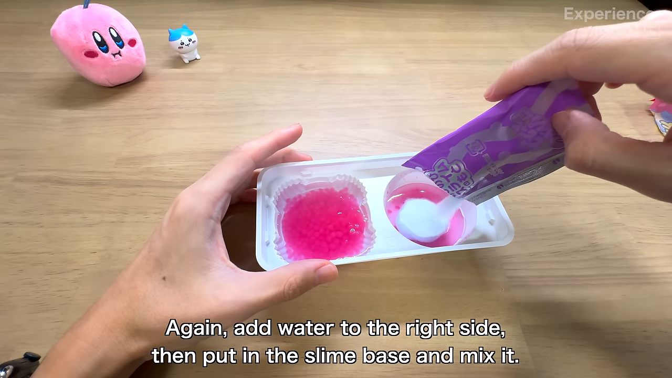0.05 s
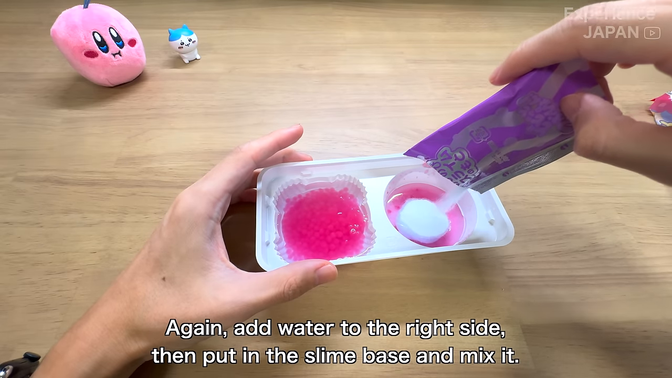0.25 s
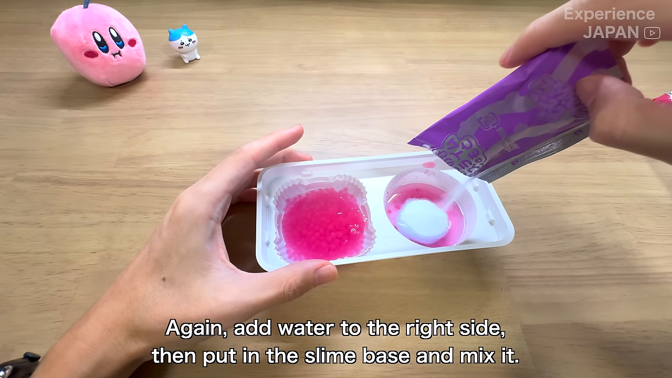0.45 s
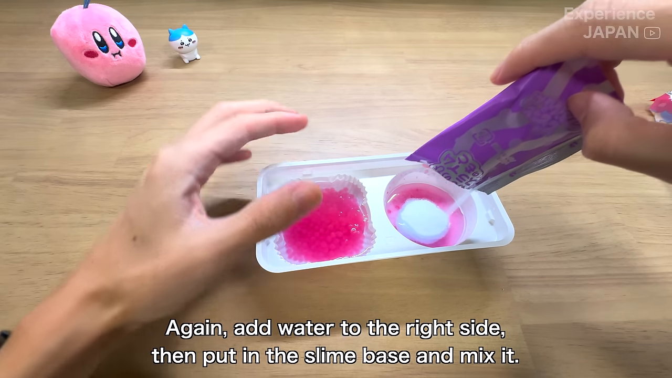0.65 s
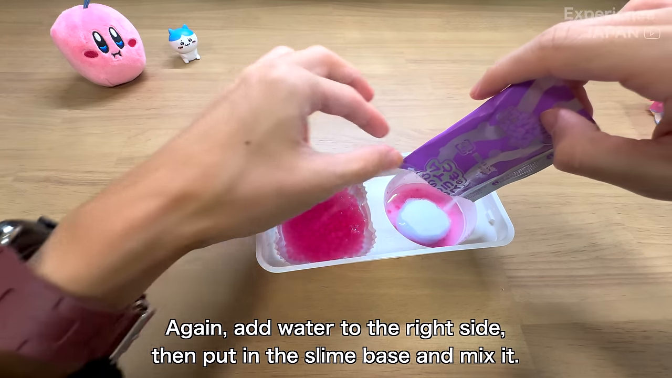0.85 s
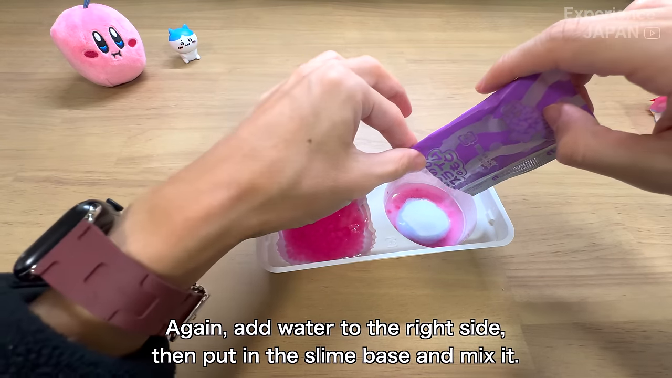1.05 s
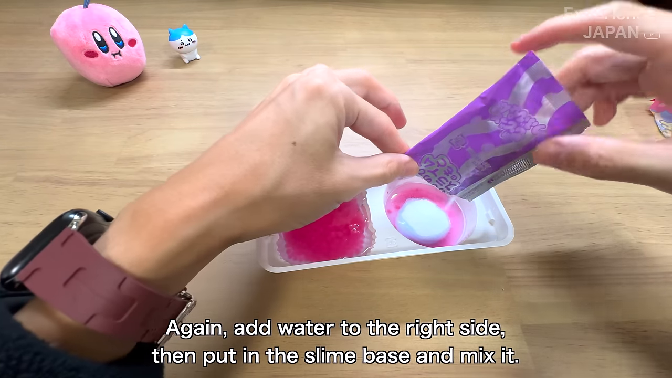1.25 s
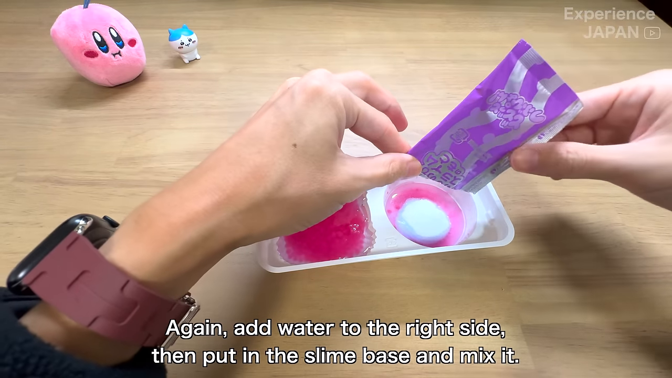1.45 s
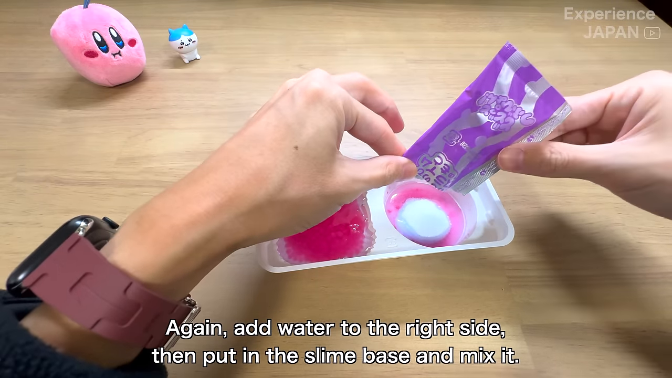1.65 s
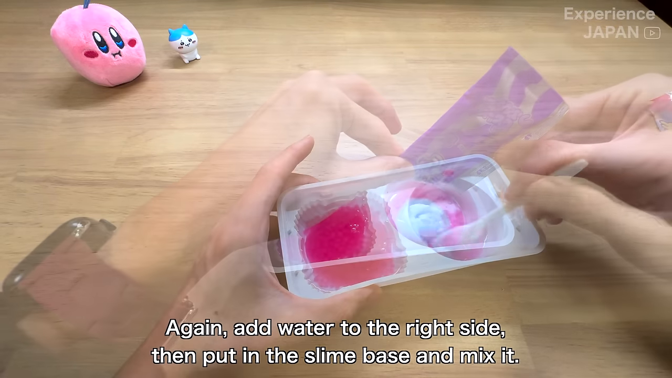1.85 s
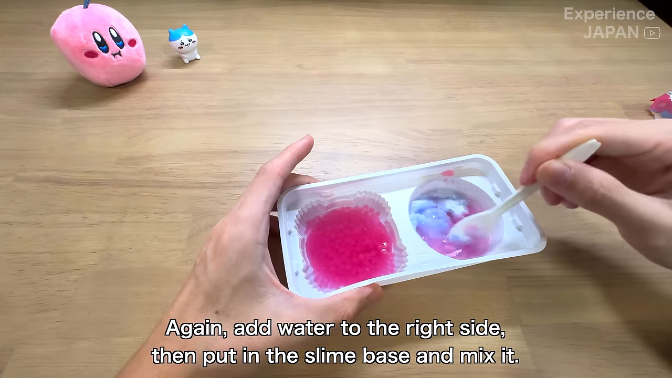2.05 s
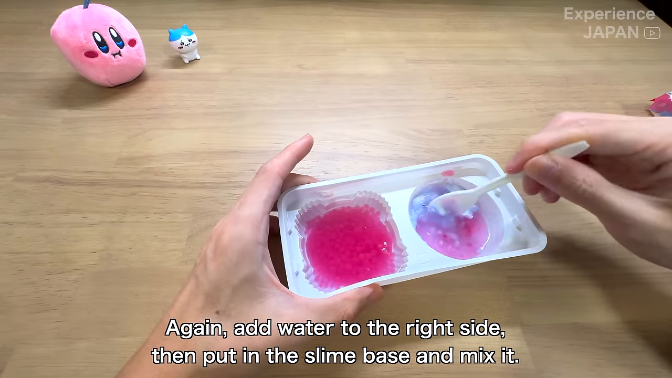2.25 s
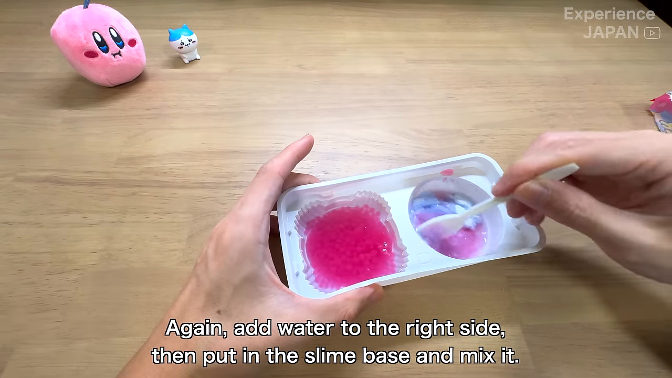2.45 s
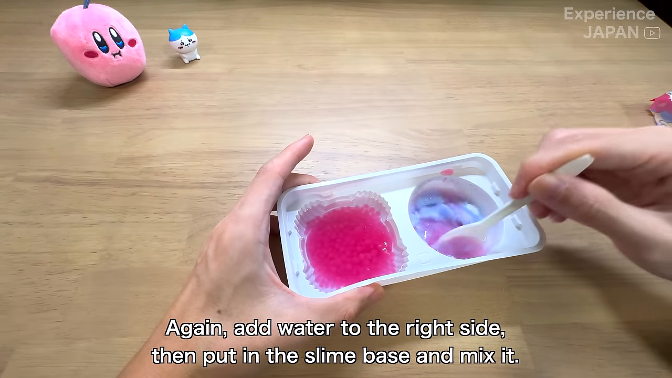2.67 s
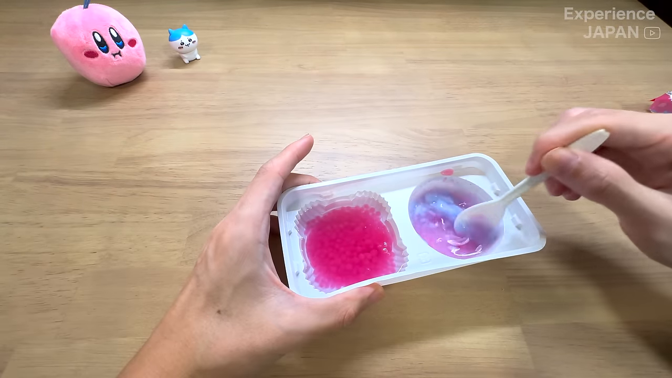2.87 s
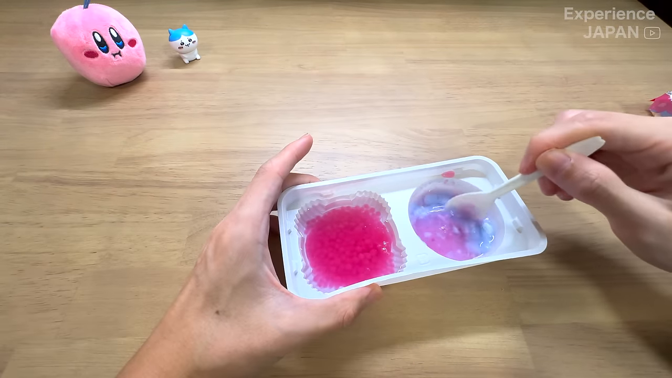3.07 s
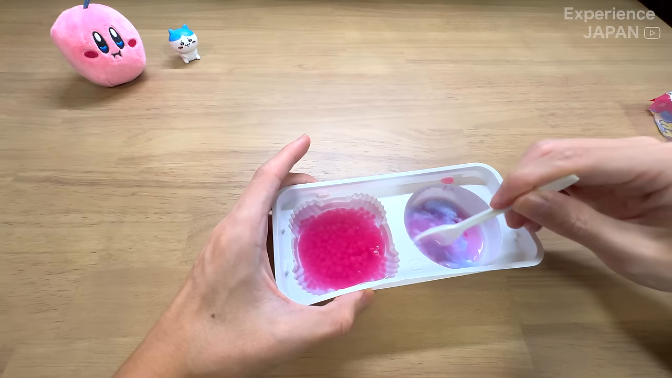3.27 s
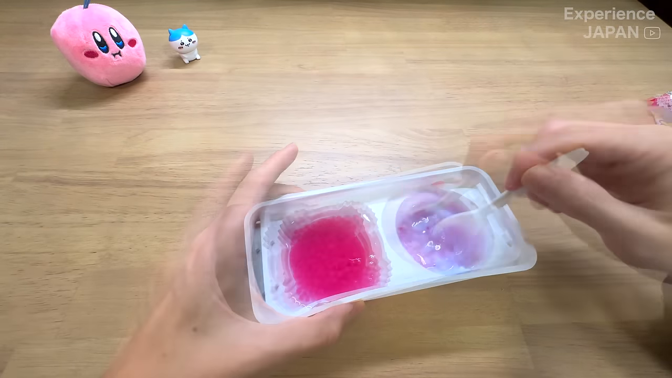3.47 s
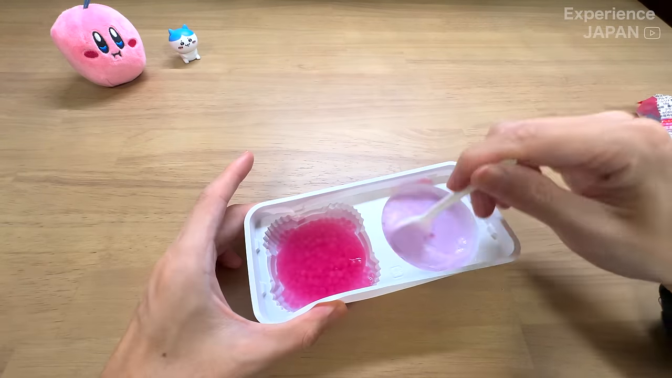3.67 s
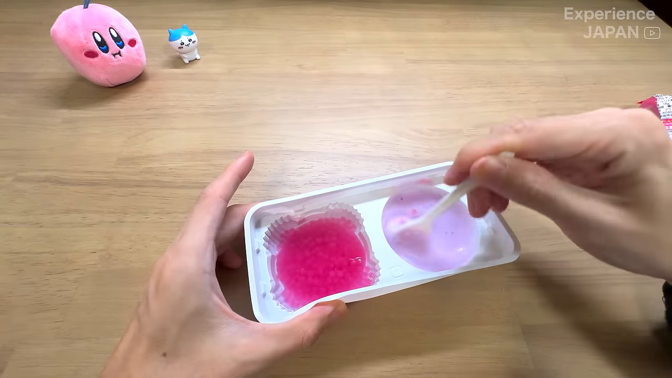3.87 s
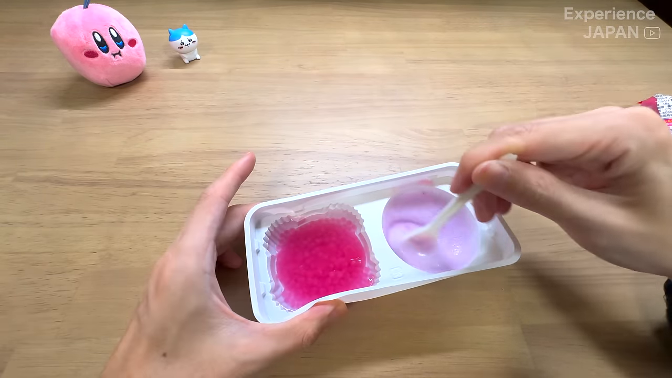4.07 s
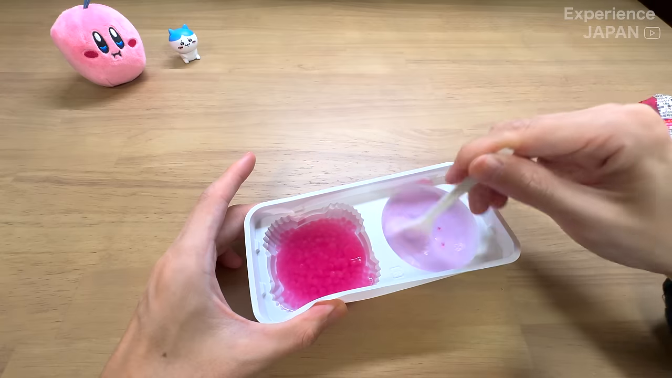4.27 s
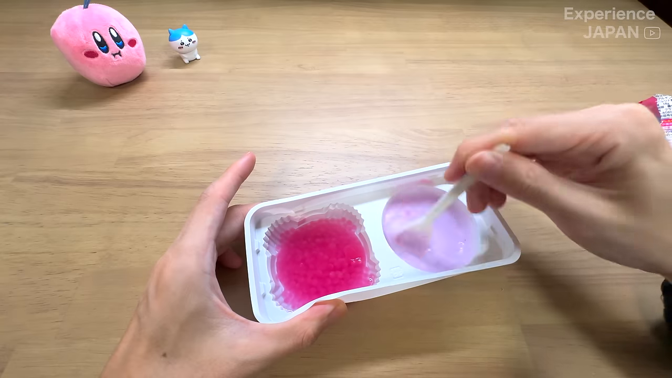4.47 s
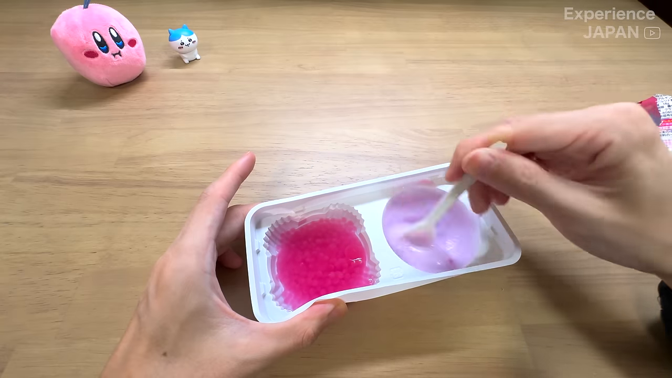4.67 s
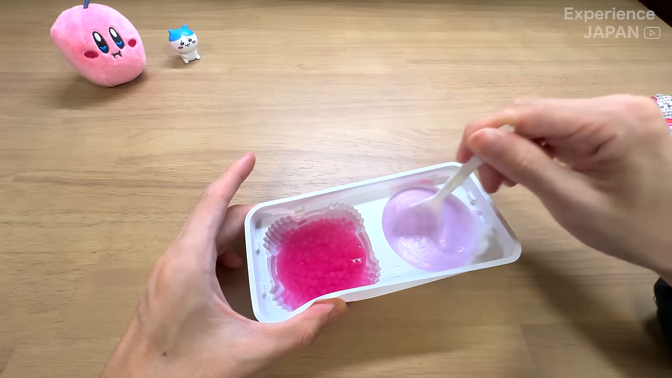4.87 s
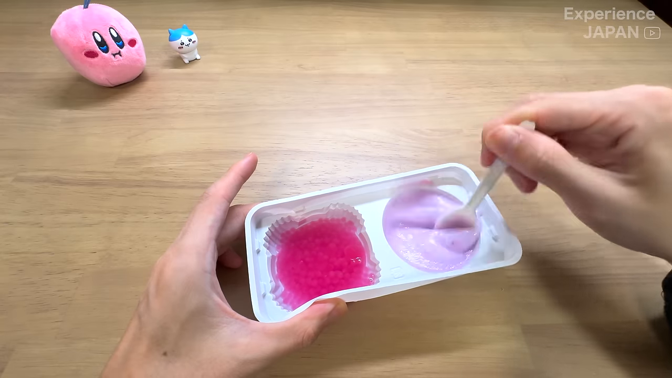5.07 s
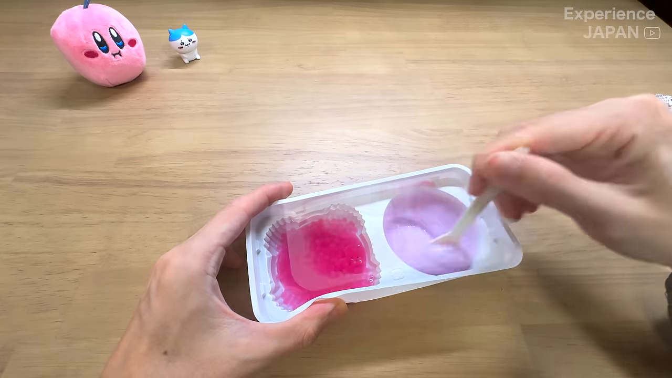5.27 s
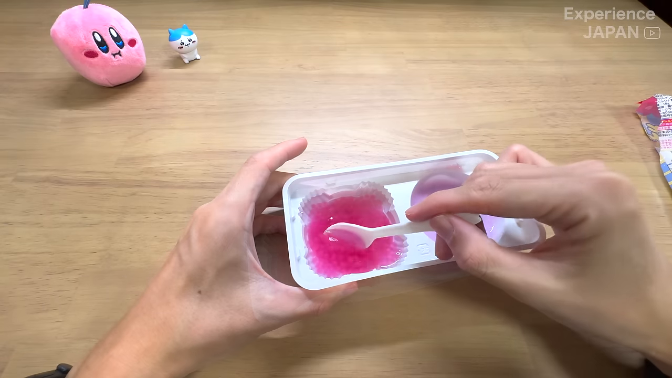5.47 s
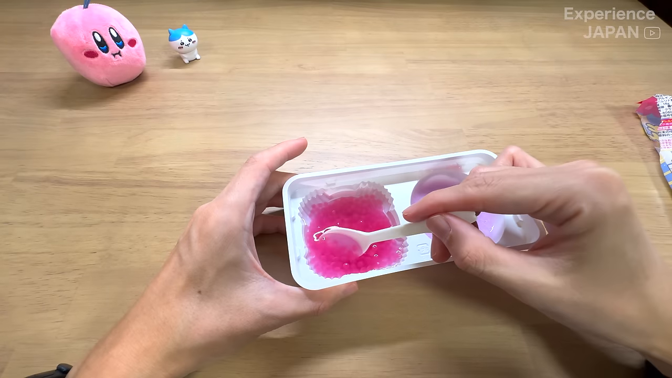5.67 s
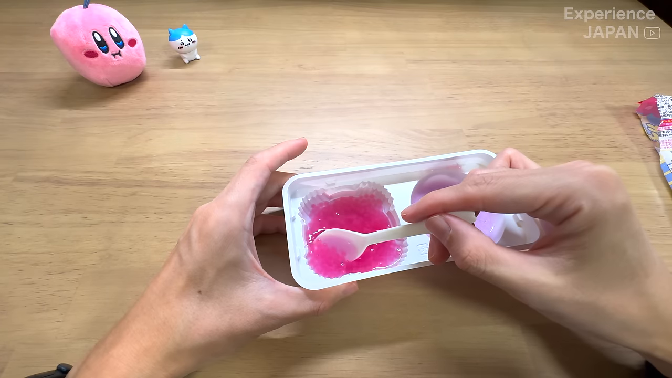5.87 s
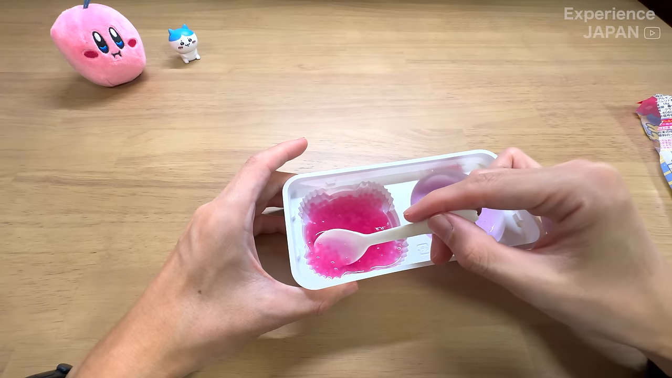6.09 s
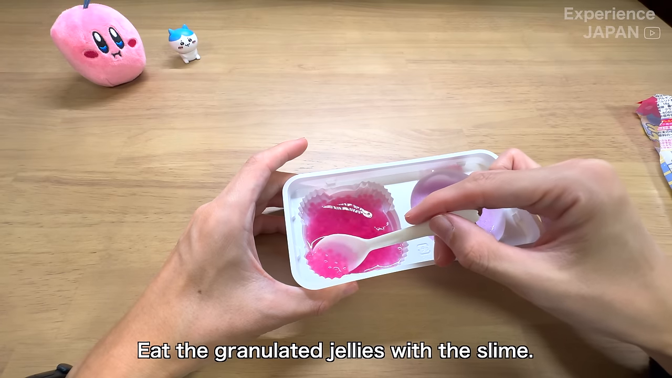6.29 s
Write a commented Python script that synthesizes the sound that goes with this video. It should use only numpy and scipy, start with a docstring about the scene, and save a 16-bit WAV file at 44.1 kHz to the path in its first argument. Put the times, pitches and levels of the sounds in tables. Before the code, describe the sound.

A small quiet room, heard very close in stereo, with faint low air throughout. From 0 to 1 s a fine, thin powder hiss weakens, with a soft packet brush near 0.5. At 1.07 a sharp foil snap breaks out, with a smaller one at 1.16. From 1.43 to 1.85 the packet is flicked and crinkled in a dense, bright crackle, the tray bumping dully on the table near 1.48. From 1.88 a small plastic spoon scrapes and catches; knocks and gritty scrapes crowd 2.26-2.85, strongest near 2.45 and 2.62, then resume more sparsely at 3.05-3.5. From 3.6 to 5.36 the stirring is far quieter: sticky squelches, soft dabs, little rising plops at 3.91, 4.63 and 5.0, and a tiny falling suck at 5.32. A light click at 5.47 leads to a barely audible wet slide until about 5.95, then a small tap at 6.21.

```python
"""Powder hisses out of a foil packet into a thin plastic tray on a wooden table: very fine random grains.
The packet is brushed, flicked and crinkled: noise cracks that ring foil panels, and pitched creases.
A small spoon taps, knocks and scrapes the gritty mix: slips and bursts through the tray's resonances.
The mix turns to slime: squelches in wandering hollows, soft dabs, plops, a falling note as the spoon pulls
free; then a light wet slide in the next well. Small quiet room, close microphone pair, faint air throughout."""
import sys
import numpy as np
from scipy import signal
from scipy.fft import rfft, irfft, next_fast_len
from scipy.io import wavfile

SR = 44100
rng = np.random.default_rng(int(sys.argv[2]) if len(sys.argv) > 2 else 0)


def digitize_waveform(pressure):
    """Quantize a signal to 16-bit integers and store it at the path in sys.argv[1].

    Rows of a 2-D input are taken as channels; values are limited to [-1, 1].
    """
    field = np.atleast_2d(pressure).T
    bounded = np.clip(field, -1, 1)
    quanta = np.round(bounded * 32767).astype(np.int16)
    wavfile.write(sys.argv[1], SR, quanta)


N = 279153
T = np.arange(N) / SR

# room air, relative spectrum: freq_hz, level_db
AIR_SPECTRUM = [(25, -6.5), (60, 7), (130, -2.5), (250, -6), (400, -16), (700, -20.5), (1500, -21),
                (4400, -30.5), (16000, -47)]
AIR_DB = -73

# powder flow down the packet, before POUR_GAIN_DB: time_s, level_db
POUR_FLOW = [(0.03, -58), (0.332, -63), (0.536, -66.5), (0.698, -67.5), (0.828, -72), (1.066, -69),
             (1.198, -65.5), (1.41, -63)]
# powder hiss, relative spectrum: freq_hz, level_db
POWDER_SPECTRUM = [(300, -9.5), (1000, -39), (1800, -14.5), (2600, -5), (3400, -4), (4500, -7), (6500, -4),
                   (8200, 2), (10000, 2.5), (12500, -6.5), (15500, 1)]
POUR_GAIN_DB = 3.5

# brushes of packet and fingers: centre_s, level_db, half_length_s
PACKET_BRUSHES = [(0.518, -55, 0.02), (1.431, -54.5, 0.0071)]
# foil snaps, level over the first 4 ms: start_s, level_db, treble_db, bass_db, panel_pitch_hz
FOIL_SNAPS = [(1.02, -56.5, 12, 16.5, 1710), (1.059, -50.5, -7.5, 8, 2900), (1.0661, -27.5, 16, 1.5, 4500),
              (1.075, -38.5, -3.5, -11, 3240), (1.1593, -39.5, 6.5, -3, 3700),
              (1.4402, -35.5, 17.5, 6.5, 2750), (1.4787, -29.5, 14.5, 2, 3440), (1.483, -26.5, 11, 5, 5900),
              (1.497, -27.5, 9.5, -8.5, 3630), (1.519, -42, -2.5, 0, 4000),
              (1.5354, -44.5, -8.5, -5.5, 4300), (1.571, -43.5, -17, -1.5, 2550),
              (1.5834, -43.5, -21, 2.5, 2670), (1.6083, -38, 16.5, -6, 3480),
              (1.6334, -37, 5.5, -4.5, 4460), (1.639, -34.5, -7.5, -4, 4150),
              (1.648, -39, -4.5, -2.5, 3000), (1.6535, -32, 20, -1, 3200), (1.661, -44.5, 0, -6, 3730),
              (1.668, -38.5, -9, 13, 3100), (1.711, -42.5, -4.5, 0, 2610), (1.7238, -36, -8, -12, 2800),
              (1.7316, -35, 10, -3.5, 3170), (1.736, -36.5, 11.5, 12, 4290), (1.786, -36, 11, -17, 3000),
              (1.7906, -37, -2.5, -7.5, 3080), (1.8027, -39.5, -14, -12, 2900),
              (1.808, -44.5, -10.5, -6, 4000), (1.8191, -42.5, 2, -7, 2210), (1.828, -28, 9, -2, 3120)]
# packet flexes that crackle: start_s, level_db, t60_s
PACKET_FLEXES = [(1.066, -47, 0.13), (1.16, -54, 0.12), (1.49, -37, 0.34), (1.648, -50, 0.14),
                 (1.729, -45.5, 0.076), (1.799, -48.5, 0.14), (1.825, -54.5, 0.37)]
# foil, relative spectrum: freq_hz, level_db
FOIL_SPECTRUM = [(60, -11), (200, -2), (450, -6.5), (800, -5.5), (1400, -8), (2100, -5.5), (3000, -2),
                 (4800, -11.5), (6200, -8.5), (8200, -9.5), (11000, -9), (15000, -15.5)]
STUTTER_S, STUTTER_DB = .005, -10  # greatest delay and strength of the cracks behind a snap
PANEL_DB, PANEL_WIDTH_HZ = 3, 330
FLEX_RISE_S, CREASE_LOW_HZ = .008, 520  # small creases have little bass

# dull bumps of tray on table: start_s, level_db, tilt_db_per_octave
TABLE_BUMPS = [(1.084, -49, 9.5), (1.174, -52.5, 12), (1.4795, -33, -8.5), (1.495, -38, 10.5),
               (1.724, -48, -9), (5.444, -55, 4)]
# tray and table together: freq_hz, level_db, t60_s
TABLE_RINGS = [(124, -11.5, 0.057), (176, 1, 0.04), (209, -5, 0.072), (345, -15, 0.075), (416, -9.5, 0.06)]

# spoon taps on the bottom of a well: start_s, level_db, tilt_db_per_octave
WELL_TAPS = [(1.652, -48, -8), (2.580, -38, -5), (3.401, -38, -13), (6.215, -46, 9)]
# bottom of a well: freq_hz, level_db, t60_s
WELL_RINGS = [(770, -8, 0.075), (1090, -4.5, 0.046), (1420, -9.5, 0.021), (2030, -13.5, 0.02)]

# spoon catching on the tray, before KNOCK_GAIN_DB: start_s, level_db, treble_db
SPOON_KNOCKS = [(1.8781, -33.5, 11), (1.9124, -36.5, -1), (2.0299, -34.5, -20), (2.2591, -39, -1),
                (2.3232, -30.5, 6), (2.4228, -31, 6.5), (2.4484, -22, 3.5), (2.5366, -33.5, -3.5),
                (2.5786, -31.5, 1), (2.611, -25, 15), (2.6249, -26, 21.5), (2.653, -36, -7.5),
                (2.7064, -26, 6), (2.7122, -29.5, -8), (2.7274, -36.5, -10), (2.7929, -35.5, -8),
                (2.8272, -33.5, 1), (3.0493, -39, 1), (3.1088, -35, 1), (3.174, -33, 10),
                (3.2683, -26.5, 3), (3.2764, -25.5, -0.5), (3.2814, -27, -10), (3.3146, -31, -10),
                (3.3352, -33.5, -11), (3.358, -39, -3), (3.3985, -32, -25), (3.4663, -27, 5),
                (4.911, -42.5, 23), (5.3185, -39.5, 0), (5.4711, -40, -8), (6.2148, -47, -1)]
# spells of spoon work: start_s, end_s, level_db, slope_db_per_s, treble_db, release_t60_s
SPOON_SPELLS = [(1.884, 2.022, -47, -18, 5, 0.14), (2.263, 2.85, -48.5, -11.5, 5.5, 0.039),
                (3.073, 3.272, -52, 8, 1, .2), (3.307, 3.504, -45.5, 12, -0.5, 0.39),
                (3.604, 3.87, -65.5, 9, 4.5, 0.12), (3.902, 4.568, -61, -2.5, 2, 0.29),
                (4.617, 5.002, -61, 7.5, 2, 0.76), (5.117, 5.358, -60, -7, 4, 0.39),
                (5.462, 5.963, -66, -22, 1, 0.19), (6.215, 6.314, -71, -38, 0.5, 0.15)]
# hard pushes through the grit: centre_s, level_db, treble_db
GRIT_PUSHES = [(1.893, -47.5, -12), (2.02, -48.5, 11), (2.356, -48.5, 1.5), (2.452, -41, -3),
               (2.579, -45, -12), (2.631, -36.5, 9.5), (2.664, -40, 5), (2.722, -40, -5.5),
               (2.784, -46, 4.5), (2.855, -46, 3.5), (3.116, -46.5, -4.5), (3.174, -45, 2),
               (3.355, -42, -1), (3.42, -48, -22)]
# wet smacks of the spoon: centre_s, level_db
WET_SMACKS = [(3.658, -61), (3.718, -58.5), (3.8, -60.5), (3.838, -59), (3.863, -58.5), (3.97, -59.5),
              (4.004, -67), (4.069, -60.5), (4.116, -53.5), (4.193, -57.5), (4.236, -58.5), (4.266, -60.5),
              (4.33, -62), (4.425, -61.5), (4.632, -59.5), (4.702, -54.5), (4.91, -58.5), (4.979, -59),
              (5.124, -64), (5.16, -59), (5.283, -57), (6.124, -65.5)]
# spoon pressing through jelly in the other well: centre_s, level_db
JELLY_WIPES = [(5.545, -72), (5.673, -67), (5.804, -72)]
# tray walls: freq_hz, width_hz, level_db
WALL_MODES = [(754, 15, 2.5), (1130, 110, -18), (1530, 13, 1), (2007, 260, 0.5), (2692, 50, -2),
              (3514, 77, -7)]
# gritty mix, relative spectrum: freq_hz, level_db
GRIT_SPECTRUM = [(60, -13), (170, -8), (520, -13.5), (750, -8), (1200, -0.5), (2000, -1), (3300, -0.5),
                 (4800, -8.5), (6200, -7.5), (8800, -6.5), (11000, -3), (15000, -13.5)]
SPELL_ATTACK_S = .0091
PUSH_S, SMACK_S, WIPE_S = .02, .016, .024  # half lengths
SKID_DELAY_S, SKID_S, SKID_DB = .0044, .014, -18.5  # after a knock: delay, half length, level against its row
REST_DB, REST_START_S, REST_END_S, REST_RISE_S = -72.5, 2.23, 3.05, .035  # faint steady rubbing
KNOCK_GAIN_DB = -7
# random lighter catches, before KNOCK_GAIN_DB: level above the rubbing, spreads of level and treble
CATCH_DB, CATCH_SPREAD_DB, CATCH_TREBLE_DB = 3, 2, 3
SMOOTH_FROM_S, OTHER_WELL_FROM_S, BLEND_S = 3.62, 5.46, .049

# random nudges of tray on table
NUDGE_START_S, NUDGE_END_S, NUDGE_DB, NUDGE_SPREAD_DB = 2.25, 2.9, -61, 3

# slime, relative spectrum: freq_hz, level_db
SLIME_SPECTRUM = [(80, -15), (200, -7), (330, -6.5), (620, -2), (900, -4.5), (1400, -7), (2000, -4),
                  (2700, -9), (3600, -6), (5000, -13.5), (6500, -14), (9300, -8), (12500, -14.5),
                  (15000, -10)]
# hollows in the slime: middle_pitch_hz, level_db
SLIME_HOLLOWS = [(720, -5), (2800, -3)]
HOLLOW_SWING_OCTAVES, HOLLOW_PER_S, HOLLOW_SHARPNESS = .6, 22, 3.5
# folds of slime flopping over: centre_s, level_db, pitch_hz
SLIME_DABS = [(3.704, -65.5, 290), (3.901, -60, 380), (4.046, -62.5, 373), (4.704, -60, 487),
              (4.87, -60.5, 420), (5.083, -62, 327)]
DAB_S = .0078  # half length
# air pockets popping in the slime: start_s, peak_db, pitch_hz
SLIME_PLOPS = [(3.914, -55, 610), (4.632, -49.5, 656), (5.0, -46, 580)]
PLOP_CYCLES, PLOP_RISE = 8.8, .16  # starting-pitch cycles to -60 dB; share the pitch has risen by then
# spoon pulling free of the slime, one row: centre_s, peak_db, pitch_hz
SPOON_SUCK = (5.3205, -43, 900)
SUCK_S, SUCK_OCTAVES_PER_S = .0036, 440  # half length; fall of pitch

# wet plastic, relative spectrum: freq_hz, level_db
WET_SPECTRUM = [(600, -12.5), (1100, -0.5), (1500, 3), (2700, 2), (3600, 0), (4600, -9.5), (6100, -6),
                (7600, -7.5), (9000, -8), (14000, -22)]

# reflections, relative spectrum: freq_hz, level_db
REFLECTION_SPECTRUM = [(200, 10), (550, 9), (1000, 9), (1700, -4.5), (3500, 3), (5000, 7.5), (9500, 4.5),
                       (13000, -23.5)]
# phase of left against right: freq_hz, phase_rad
LEFT_PHASE = [(0, 0), (2000, 0), (4000, -.35), (6500, -.7), (8500, -1.7), (9500, -1.45), (11200, -2.95),
              (13900, -3.3), (15500, -4.3)]
# level of the left microphone over the right: freq_hz, level_db
LEFT_LEVEL = [(60, 2.5), (130, 2), (300, 6), (600, 3.5), (1400, -0.5), (2800, 1.5), (5600, 2), (9000, -0.6)]
CUTOFF_HZ = 16200


def from_db(db):
    """Decibels to gain."""
    return 10 ** (np.asarray(db) / 20)


def rms_one(x):
    """Scale to unit power."""
    return x / np.sqrt(np.mean(x ** 2) + 1e-20)


def add(track, s, sound):
    """Mix a short sound in at time s."""
    at = max(round(s * SR), 0)
    track[at:at + len(sound)] += sound[:len(track) - at]


def cut(x, hz, kind, order=2):
    """Butterworth low- or high-pass."""
    return signal.sosfilt(signal.butter(order, hz, kind, fs=SR, output="sos"), x)


def colour(x, spectrum, size=4096):
    """Minimum-phase filter with the given spectrum, falling off below its first point."""
    hz, db = np.transpose(spectrum)
    f = np.maximum(np.arange(size // 2 + 1) * SR / size, 1)
    gain = from_db(np.interp(np.log(f), np.log(hz), db)) * np.minimum(f / hz[0], 1)
    # fold the cepstrum to make the response causal
    cepstrum = irfft(np.log(gain))
    cepstrum[1:size // 2] *= 2
    cepstrum[size // 2 + 1:] = 0
    response = irfft(np.exp(rfft(cepstrum)))
    filtered = signal.fftconvolve(np.atleast_2d(x), response[None], axes=1)
    return filtered[:, :x.shape[-1]].reshape(x.shape)


def drift(rate_per_s):
    """Smooth random curve of unit power, with rate_per_s new targets a second."""
    knots = rng.standard_normal(N // 10)
    return rms_one(np.interp(T * rate_per_s, np.arange(len(knots)), knots))


def swell(s, half_s):
    """Gaussian rise and fall of height 1 about time s."""
    out = np.zeros(N)
    near = np.abs(T - s) < 4 * half_s
    out[near] = np.exp(-((T[near] - s) / half_s) ** 2)
    return out


def held(start_s, end_s, attack_s, t60_s):
    """Rise to 1 at the start, hold until the end, then decay."""
    rise = np.exp(-(np.minimum(T - start_s, 0) / attack_s) ** 2)
    return rise * from_db(-60 * np.maximum(T - end_s, 0) / t60_s)


def scattered(start_s, end_s, count):
    """Random moments, one in each equal share of a span."""
    return start_s + (end_s - start_s) * (np.arange(count) + rng.random(count)) / count


def grains(per_s, spread_db, clump_db, clump_per_s):
    """Tiny slips of random time, size and sign; clump_db makes their strength drift."""
    sizes = from_db(spread_db * np.minimum(rng.exponential(1, N), 4)) * rng.choice([-1, 1], N)
    present = rng.random(N) < per_s / SR
    return sizes * present * from_db(clump_db * np.clip(drift(clump_per_s), -2, 2))


def resonator(hz, width_hz):
    """Coefficients of a two-pole resonance with gain 1 on top."""
    r = np.exp(-np.pi * width_hz / SR)
    zeros = np.array([1, 0, -1]) * (1 - r * r) / 2
    return zeros, [1, -2 * r * np.cos(2 * np.pi * hz / SR), r * r]


def resonate(x, hz, width_hz):
    """Ring one fixed resonance."""
    return signal.lfilter(*resonator(hz, width_hz), x + 1e-18)


def pitched(clicks, sharpness, patchy_db, patchy_per_s, plain_db, count=40):
    """Each grain rings one of many pitches, and the favoured pitches shift as the contact moves."""
    out, at = np.zeros(N), np.flatnonzero(clicks)
    dealt = rng.integers(0, count, N)[at]
    for k, hz in enumerate(np.geomspace(220, 15000, count)):
        mine, own = at[dealt == k], np.zeros(N)
        favour = np.clip(rng.standard_normal(N // 100), -1.8, 1.8)
        patch = np.interp(T[mine] * patchy_per_s, np.arange(len(favour)), favour)
        own[mine] = clicks[mine] * from_db(patchy_db * patch)
        out += resonate(own, hz, hz / max(sharpness, 2)) * (-1) ** k
    return rms_one(out) + from_db(plain_db) * rms_one(clicks)


def brighten(x, treble_db, split_hz=4700):
    """A harder contact lifts the treble; scaled by the power of both bands."""
    low = cut(x, split_hz, "low", order=3)
    high = cut(x, split_hz, "high", order=3)
    lift = from_db(treble_db)
    return (low + lift * high) / np.sqrt(low.var() + lift ** 2 * high.var())


def bursts(count, t60_s, tail_db, tail_t60_s, ring_db, ring_t60_s, size=6000, order=5):
    """Crowded modes of a thin sheet: a brief noise crack, a weak tail and a few stronger modes."""
    t = np.arange(size) / SR
    envelope = from_db(-60 * t / t60_s) + from_db(tail_db - 60 * t / tail_t60_s)
    crack = rng.standard_normal((count, size)) * envelope
    hz = rng.uniform(900, 9500, (count, order, 1))
    modes = np.sin(2 * np.pi * hz * t).sum(axis=1)
    return crack + modes * from_db(ring_db - 60 * t / ring_t60_s)


def strike(rows, sounds):
    """Give each burst its treble and its level over the first 4 ms, and play it at its time."""
    out = np.zeros(N)
    first = round(.004 * SR)
    for (s, db, treble_db, *_), sound in zip(rows, sounds):
        sound = brighten(sound, treble_db)
        add(out, s, from_db(db) * sound / sound[:first].std())
    return out


def thuds(blows, modes, size=8000):
    """Each blow swells decaying modes of slightly random strength; tilt favours upper or lower ones."""
    out, t = np.zeros(N), np.arange(size) / SR
    hz, mode_db, t60_s = np.transpose(modes)[:, :, None]
    rings = np.sin(2 * np.pi * hz * t) * from_db(mode_db - 60 * t / t60_s) * (1 - np.exp(-2 * hz * t))
    octaves = np.log2(hz / np.median(hz)).ravel()
    for s, db, tilt_db in blows:
        strengths = from_db(db + tilt_db * octaves + rng.normal(0, 1.5, len(hz)))
        add(out, s, strengths @ rings)
    return out


def air():
    """The room's low rumble, alike at both microphones, and its faint hiss: coloured noise."""
    mid, side = colour(rng.standard_normal((2, N)), AIR_SPECTRUM)
    return from_db(AIR_DB) * rms_one(mid + cut(side, 150, "high") * [[1], [-1]])


def powder():
    """Very fine grains hiss along the foil, their level following the flow."""
    level_db = np.interp(T, *np.transpose(POUR_FLOW))
    fade = np.interp(T, [1.42, 1.6], [1, 0])
    hiss = colour(grains(per_s=14000, spread_db=5, clump_db=0, clump_per_s=57), POWDER_SPECTRUM)
    return fade * from_db(level_db + POUR_GAIN_DB) * rms_one(hiss)


def brushes():
    """Packet and fingers rub: dense coloured slips in short swells."""
    slips = grains(per_s=12000, spread_db=3, clump_db=2, clump_per_s=300)
    friction = rms_one(cut(colour(slips, FOIL_SPECTRUM), 1100, "high"))
    return friction * sum(from_db(db) * swell(s, half_s) for s, db, half_s in PACKET_BRUSHES)


def snaps(count=3):
    """A crease gives way in a stutter: a crack and smaller copies behind it ring the buckled panel."""
    cracks = bursts(len(FOIL_SNAPS), t60_s=.0025, tail_db=-33, tail_t60_s=.07, ring_db=-15, ring_t60_s=.012)
    chances = rng.random((len(FOIL_SNAPS), 2, count))
    runs = []
    for (*_, panel_hz), crack, chance in zip(FOIL_SNAPS, cracks, chances):
        run = crack.copy()
        for delay, strength in chance.T:
            add(run, STUTTER_S * delay, from_db(STUTTER_DB) * strength * crack)
        runs.append(run + from_db(PANEL_DB) * resonate(run, panel_hz, PANEL_WIDTH_HZ))
    sounds = colour(np.array(runs), FOIL_SPECTRUM)
    # a wide panel buckles with more bass than a small crease
    bass_gain = from_db(np.array(FOIL_SNAPS)[:, 3:4])
    sounds = sounds + (bass_gain - 1) * cut(sounds, 700, "low", order=1)
    return strike(FOIL_SNAPS, sounds)


def crackle():
    """Small creases buckle after each flex: pitched slips under a dying envelope."""
    buckles = grains(per_s=2200, spread_db=4.5, clump_db=3, clump_per_s=320)
    creases = pitched(buckles, sharpness=7, patchy_db=2.5, patchy_per_s=70, plain_db=-2)
    creases = cut(rms_one(colour(creases, FOIL_SPECTRUM)), CREASE_LOW_HZ, "high")
    return creases * sum(from_db(db) * held(s, s, FLEX_RISE_S, t60_s) for s, db, t60_s in PACKET_FLEXES)


def bumps():
    """The tray bumps the table, ringing its low modes; 3.2 dB louder at the left."""
    blows = list(TABLE_BUMPS) + nudges()
    return thuds(blows, TABLE_RINGS) * from_db(1.6 * np.array([[1], [-1]]))


def taps():
    """The spoon taps the bottom of a well, which rings briefly."""
    return cut(thuds(WELL_TAPS, WELL_RINGS), 510, "high")


def tray(x, damping_db=0, modes=WALL_MODES):
    """A contact is heard directly and through the ringing tray walls."""
    return x + sum(from_db(db - damping_db) * resonate(x, hz, width_hz) for hz, width_hz, db in modes)


def effort():
    """Strength and treble_db of the rubbing: steady spells with pushes, skids, smacks and wipes on top."""
    moves = []
    for start_s, end_s, db, slope, treble_db, t60_s in SPOON_SPELLS:
        level_db = db + slope * (np.clip(T, start_s, end_s) - start_s)
        moves.append((from_db(level_db) * held(start_s, end_s, SPELL_ATTACK_S, t60_s), treble_db))
    moves += [(from_db(db) * swell(s, PUSH_S), treble_db) for s, db, treble_db in GRIT_PUSHES]
    # after each knock in the grit the spoon skids on
    moves += [(from_db(db + SKID_DB) * swell(s + SKID_DELAY_S, SKID_S), treble_db)
              for s, db, treble_db in SPOON_KNOCKS if s < SMOOTH_FROM_S]
    moves += [(from_db(db) * swell(s, SMACK_S), 0) for s, db in WET_SMACKS]
    moves += [(from_db(db) * swell(s, WIPE_S), 0) for s, db in JELLY_WIPES]
    moves.append((from_db(REST_DB) * held(REST_START_S, REST_END_S, REST_RISE_S, t60_s=.14), 0))
    power = sum(gain ** 2 for gain, _ in moves) + 1e-18
    treble_db = sum(gain ** 2 * treble for gain, treble in moves) / power
    return np.sqrt(power), treble_db


def catches(strength, count=56):
    """Random light catches that follow the rubbing's strength: start_s, level_db, treble_db."""
    times = scattered(SPOON_SPELLS[0][0], OTHER_WELL_FROM_S, count)
    rows = []
    for s, (size, hardness) in zip(times, rng.standard_normal((count, 2))):
        rubbing_db = 20 * np.log10(np.interp(s, T, strength))
        rows.append((s, rubbing_db + CATCH_DB + CATCH_SPREAD_DB * size, CATCH_TREBLE_DB * hardness))
    return rows


def knocks(strength):
    """Spoon catches strike the tray: noise bursts through its walls."""
    hits = list(SPOON_KNOCKS) + catches(strength)
    cracks = bursts(len(hits), t60_s=.009, tail_db=-22, tail_t60_s=.05, ring_db=-16, ring_t60_s=.022)
    sounds = colour(tray(cracks, damping_db=2), GRIT_SPECTRUM)
    sounds = cut(sounds, 330, "high", order=1)  # the light spoon hardly shakes the table
    return from_db(KNOCK_GAIN_DB) * strike(hits, sounds)


def grit():
    """Coarse scraping: pitched slips through the tray walls."""
    slips = grains(per_s=4500, spread_db=2.9, clump_db=1.9, clump_per_s=300)
    scrape = pitched(slips, sharpness=12, patchy_db=2.5, patchy_per_s=45, plain_db=0)
    return colour(tray(scrape), GRIT_SPECTRUM)


def spoon():
    """One effort drives the rubbing, which blends from grit to slime to wet slide, with knocks added."""
    strength, treble_db = effort()
    gritty, smooth, wet = (brighten(rub, treble_db) for rub in (grit(), slime(), slide()))
    mixed = np.clip(.5 + (T - SMOOTH_FROM_S) / BLEND_S, 0, 1)
    moved = np.clip(.5 + (T - OTHER_WELL_FROM_S) / BLEND_S, 0, 1)
    rubbing = np.sqrt(1 - mixed) * gritty + np.sqrt(mixed * (1 - moved)) * smooth + np.sqrt(moved) * wet
    return strength * rubbing + knocks(strength)


def nudges(count=12):
    """Stirring nudges the tray against the table: start_s, level_db, tilt_db_per_octave."""
    times = scattered(NUDGE_START_S, NUDGE_END_S, count)
    return [(s, NUDGE_DB + NUDGE_SPREAD_DB * size, 0) for s, size in zip(times, rng.standard_normal(count))]


def hollow(x, hz, swing_octaves, per_s, sharpness, size=128):
    """A hollow opens and closes behind the spoon: its resonance wanders in pitch."""
    centre_hz = hz * 2 ** (swing_octaves * np.clip(drift(per_s), -2, 2))
    out, state = np.zeros(N), np.zeros(2)
    for i in range(0, N, size):
        zeros, poles = resonator(centre_hz[i], centre_hz[i] / sharpness)
        out[i:i + size], state = signal.lfilter(zeros, poles, x[i:i + size], zi=state)
    return out


def slime():
    """Sticky squelches ring the shifting hollows and the damped upper wall modes."""
    slips = grains(per_s=4000, spread_db=3, clump_db=1.8, clump_per_s=160)
    squelch = pitched(slips, sharpness=6, patchy_db=3, patchy_per_s=25, plain_db=-2)
    hollows = sum(from_db(db) * hollow(squelch, hz, HOLLOW_SWING_OCTAVES, HOLLOW_PER_S, HOLLOW_SHARPNESS)
                  for hz, db in SLIME_HOLLOWS)
    walls = tray(squelch, damping_db=4, modes=WALL_MODES[1:])
    return colour(walls + hollows, SLIME_SPECTRUM)


def dabs():
    """Folds of slime flop over: short clumps of dull slips, each around its own note."""
    slips = grains(per_s=2500, spread_db=2, clump_db=1, clump_per_s=200)
    out = np.zeros(N)
    for s, db, hz in SLIME_DABS:
        shape = swell(s, DAB_S)
        clump = cut(resonate(slips * shape, hz, hz), 2 * hz, "low")
        out += from_db(db) * clump * np.linalg.norm(shape) / np.linalg.norm(clump)
    return out


def plops(size=2000):
    """Air pockets open as the spoon pulls through: decaying sines of rising pitch."""
    out, t = np.zeros(N), np.arange(size) / SR
    for s, db, hz in SLIME_PLOPS:
        age = t * hz / PLOP_CYCLES
        phase = 2 * np.pi * hz * t * (1 + .5 * PLOP_RISE * age)
        add(out, s, np.sin(phase) * from_db(db - 60 * age))
    return out


def suck():
    """The spoon pulls free and the gap opens: a short sine swell of falling pitch."""
    s, db, hz = SPOON_SUCK
    note_hz = hz * 2 ** np.clip(-(T - s) * SUCK_OCTAVES_PER_S, -1, 2)
    return from_db(db) * swell(s, SUCK_S) * np.sin(2 * np.pi * np.cumsum(note_hz) / SR)


def slide():
    """Light wet slide: sharply pitched slips through the walls and one wandering hollow."""
    slips = grains(per_s=7000, spread_db=2.2, clump_db=1.4, clump_per_s=90)
    smear = pitched(slips, sharpness=20, patchy_db=2, patchy_per_s=14, plain_db=-9)
    gap = hollow(smear, hz=2800, swing_octaves=.3, per_s=11, sharpness=7)
    return colour(tray(smear) + gap, WET_SPECTRUM)


def room(x, near_db, near_t60_s, far_db, far_t60_s, size=22000, count=5):
    """Quick reflections off table and hands, then the room's faint tail; different at each microphone."""
    t = np.arange(size) / SR
    near = from_db(-60 * t / near_t60_s) * (t > .001)
    far = from_db(-60 * t / far_t60_s) * (t > .006)
    near *= from_db(near_db) / np.linalg.norm(near)
    far *= from_db(far_db) / np.linalg.norm(far)
    envelope = np.hypot(near, far)
    # the contact point keeps moving: fade between sets of reflections
    shares = np.array([drift(20) for _ in range(count)])
    shares /= np.linalg.norm(shares, axis=0)
    out = np.zeros((2, N))
    for share in shares:
        response = colour(rng.standard_normal((2, size)) * envelope, REFLECTION_SPECTRUM)
        out += signal.fftconvolve((x * share)[None], response, axes=1)[:, :N]
    return out


def microphones(x):
    """Treble differs in phase between left and right; the left is slightly louder over most of the range."""
    size = next_fast_len(N + 1000)
    hz = np.arange(size // 2 + 1) * SR / size
    phase_rad = np.interp(hz, *np.transpose(LEFT_PHASE))
    left_db = np.interp(hz, *np.transpose(LEFT_LEVEL))
    sides = np.array([[1], [-1]])
    response = np.exp(.5j * phase_rad * sides) * from_db(.5 * left_db * sides)
    return irfft(rfft(x, size) * response, size)[:, :N]


def scene():
    """Contacts reach the microphones directly and by reflection; bumps and air are added in stereo."""
    packet = brushes() + snaps() + crackle()
    dry = powder() + packet + taps() + spoon() + dabs() + plops() + suck()
    reflections = room(dry, near_db=-10, near_t60_s=.018, far_db=-18, far_t60_s=.28)
    return microphones(dry) + bumps() + reflections + air()


def record(dry):
    """Steep low-pass at CUTOFF_HZ."""
    return signal.sosfilt(signal.ellip(10, .1, 70, CUTOFF_HZ, fs=SR, output="sos"), dry)


dry = scene()
out = record(dry)
digitize_waveform(out)
```